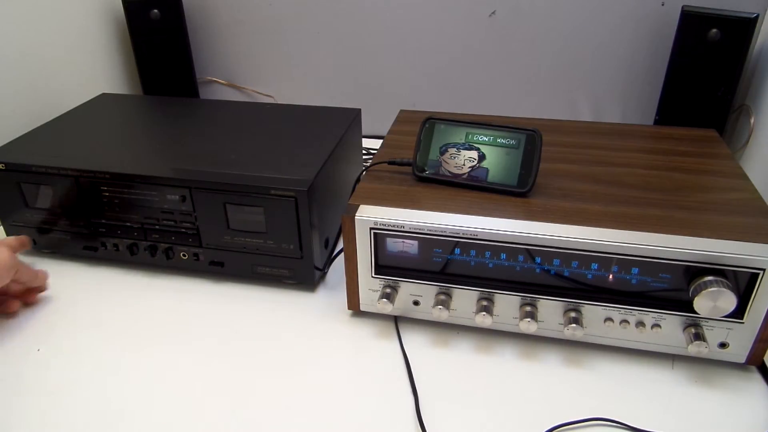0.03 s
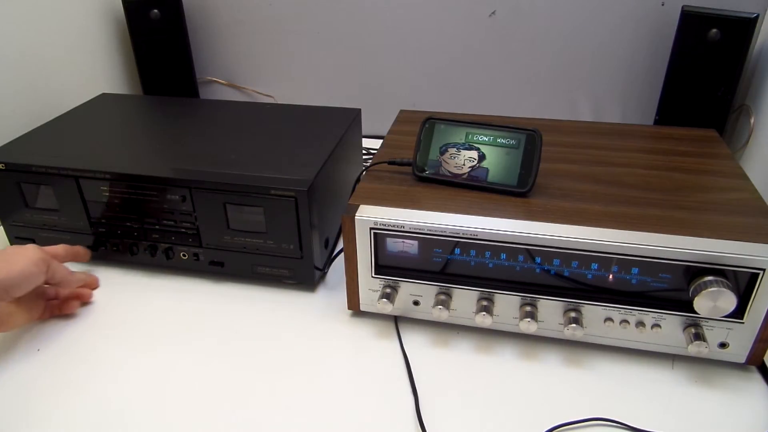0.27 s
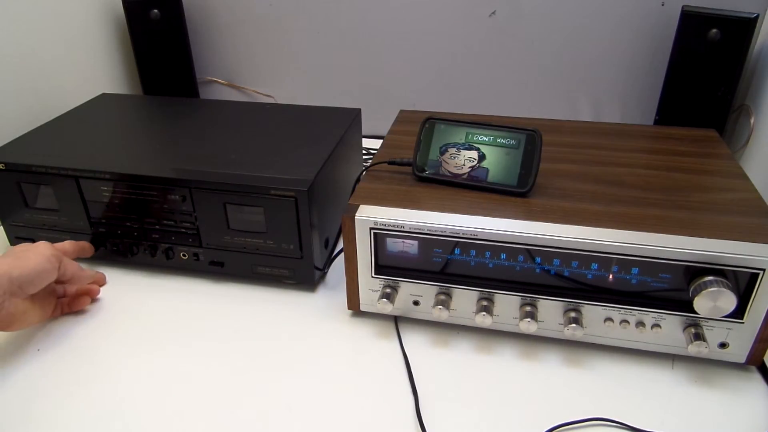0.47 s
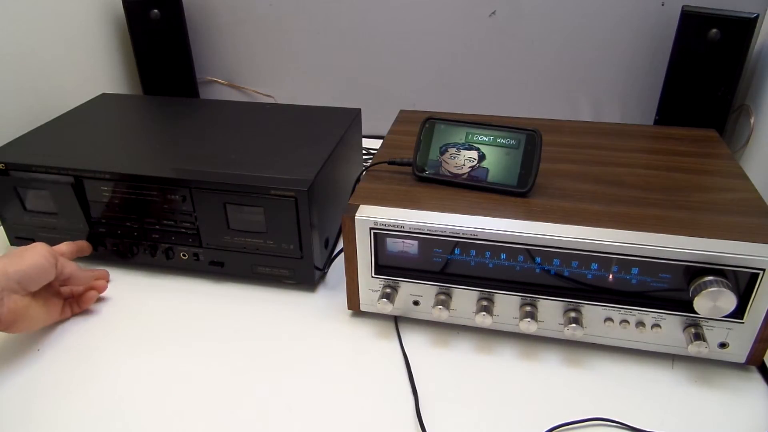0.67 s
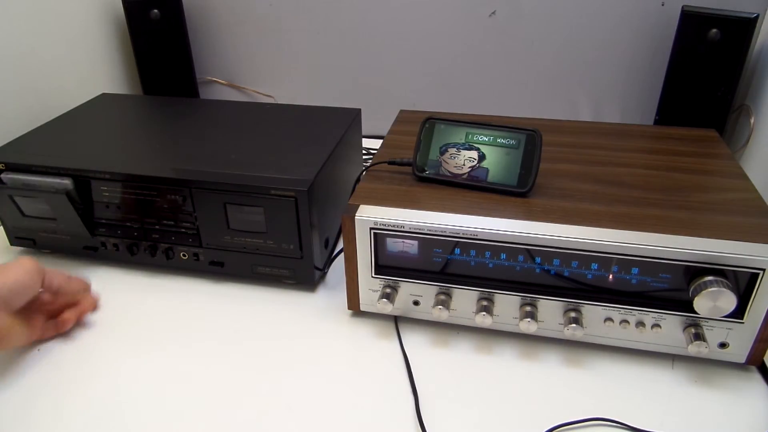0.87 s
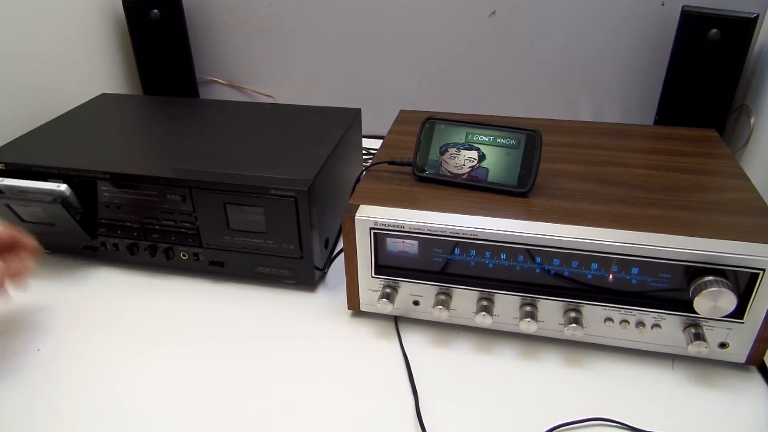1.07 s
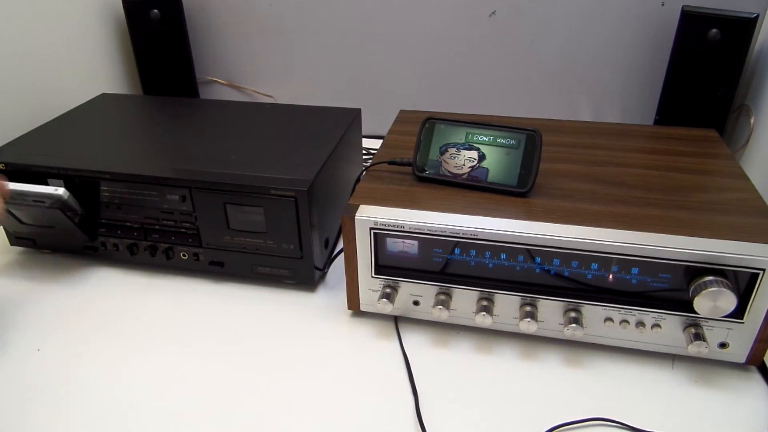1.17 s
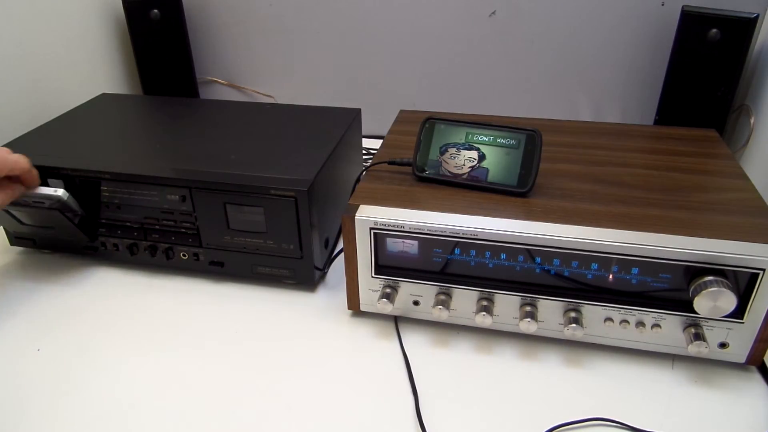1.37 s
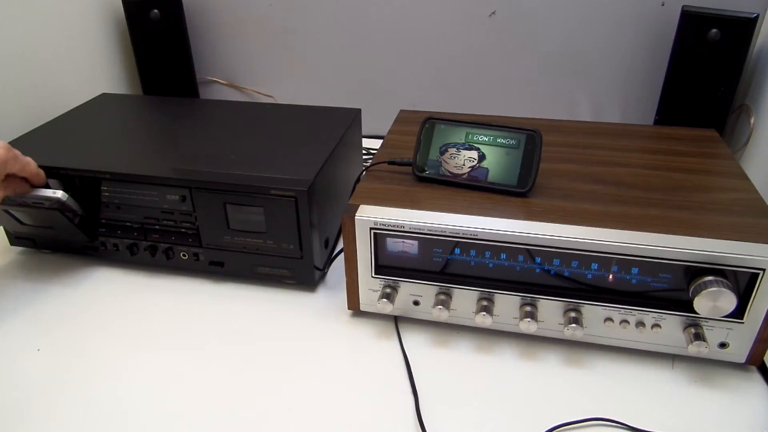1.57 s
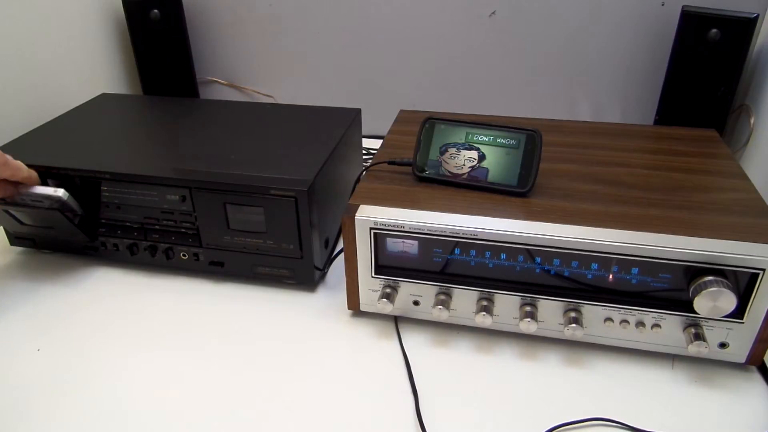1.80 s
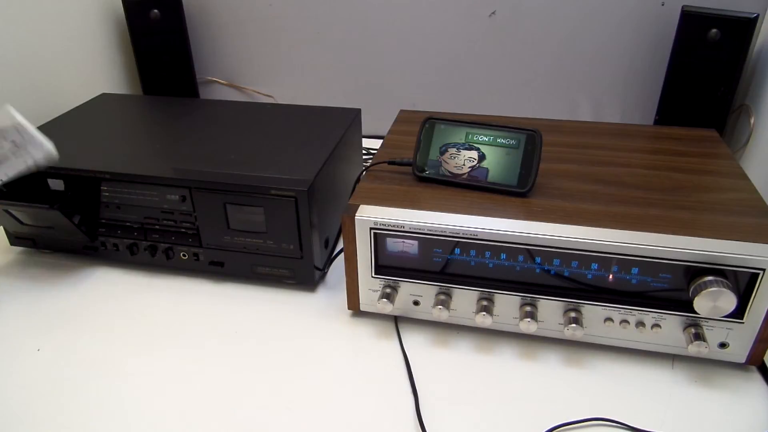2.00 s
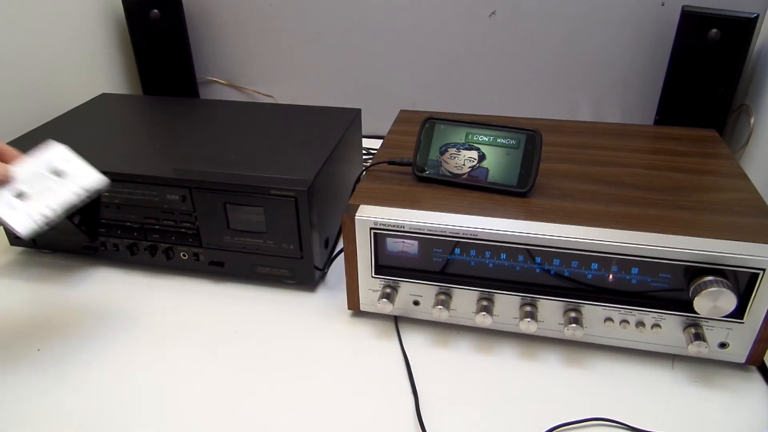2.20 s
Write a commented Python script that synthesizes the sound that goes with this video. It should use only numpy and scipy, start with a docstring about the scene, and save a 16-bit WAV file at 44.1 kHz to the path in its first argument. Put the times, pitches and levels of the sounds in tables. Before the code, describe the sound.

A cassette is ejected and pulled from a tape deck. Quiet room air and low hum come first, then faint key and latch clicks at 0.4 to 0.75 seconds, a brief glide, and a sharp door clack at 0.85. After a pause, plastic knocks begin around 1.45, building to a bright scraping rattle near 2.0, then thin squeaks until 2.25. Close microphone, short room echo.

```python
"""In a small room, a tape deck's eject key unlatches the door, which glides open and hits its stop.
Fingers knock the cassette about in its holder, then drag it out with a scrape, a rattle and a thin squeak.
Knocks are short noise bursts plus the dying tones of the case, the latch and the cassette shell.
Sliding is a stream of tiny random clicks, and squeaks are pairs of wavering tones.
Desk and walls throw it all back as fading echoes, over soft airy noise and a low hum."""
import sys
import numpy as np
from scipy import signal
from scipy.fft import rfft, irfft
from scipy.io import wavfile
from scipy.ndimage import uniform_filter1d

SR = 44100
rng = np.random.default_rng(int(sys.argv[2]) if len(sys.argv) > 2 else 0)


def store_pcm(level_fs):
    """Save levels as 16-bit WAV."""
    pcm = np.round(np.clip(level_fs, -1, 1) * 32767).astype(np.int16)
    wavfile.write(sys.argv[1], SR, np.atleast_2d(pcm).T)


N = 99048  # length in samples


def amp(db):
    """Turns decibels into a gain."""
    return 10 ** (np.asarray(db) / 20)


def unit(x):
    """Scales a sound to rms 1."""
    return x / np.sqrt(np.mean(x ** 2) + 1e-20)


def read(points, hz):
    """Reads a table between its points, along a log-frequency axis."""
    point_hz, value = np.transpose(points)
    return np.interp(np.log(hz + 1), np.log(point_hz + 1), value)


def add(mix, s, sound):
    """Mixes a sound in at time s, in seconds."""
    part = mix[round(s * SR):][:len(sound)]
    part += sound[:len(part)]


def colour(x, points):
    """Filters x by a table of frequency and dB, then scales it to rms 1."""
    gain = amp(read(points, np.fft.rfftfreq(len(x), 1 / SR)))
    return unit(irfft(rfft(x) * gain, len(x)))


def drift(size, hz):
    """Slow random motion up to about the given rate; rms 1 over the whole scene, then cut to size."""
    lowpass = np.exp(-(np.fft.rfftfreq(N, 1 / SR) / hz) ** 2)
    slow = irfft(rfft(rng.standard_normal(N)) * lowpass, N)
    return unit(slow)[:size]


# Steady tones of the hum. Each row: frequency in Hz, rms level in dB before the slow level changes.
HUM_TONES = [(48.4, -69), (301.5, -70), (328.4, -69), (355.3, -66.5), (479, -71.5), (667.5, -69.5),
             (872.1, -68), (1174, -100.5), (1369, -72), (1744, -73.5)]
# How the hum swells and sinks. Each row: time in seconds, change in dB.
HUM_LEVEL = [(0, -2), (.45, 0), (1.05, 4), (1.35, 0.5), (2.25, 3)]
# Tone colour of the room air. Each row: frequency in Hz, relative strength in dB.
AIR_COLOUR = [(12, -56), (20, 0.5), (49, 1), (70, -10), (168, 0), (234, -0.5), (357, -8), (388, 1),
              (472, -5), (527, -2), (849, -3), (1660, -11.5), (1810, -10.5), (1960, -15), (16000, -22.5)]
# How the air swells and sinks. Each row: time in seconds, change in dB.
AIR_LEVEL = [(0, 0), (.4, 0), (.95, 2.5), (1.4, 0.2), (2.25, 2.2)]
AIR_DB = -57  # before the slow level changes
HUM_WAVER_HZ = 3.11  # rms wander of each tone's frequency


def background():
    """Room air is filtered noise; the hum is a set of sines whose pitches wander separately."""
    t = np.arange(N) / SR
    hum = np.zeros(N)
    for hz, db in HUM_TONES:
        wander = np.cumsum(HUM_WAVER_HZ * drift(N, 13.6)) / SR
        cycles = hz * t + wander + rng.random()
        hum += amp(db) * unit(np.sin(2 * np.pi * cycles))
    hum *= amp(np.interp(t, *np.transpose(HUM_LEVEL)))
    air_gain = amp(AIR_DB + np.interp(t, *np.transpose(AIR_LEVEL)))
    return hum + air_gain * colour(rng.standard_normal(N), AIR_COLOUR)


def ring(modes, tilt_db=0):
    """A struck body's modes swell over a few cycles and die; tilt, in dB per octave, favours high ones."""
    t = np.arange(SR // 2) / SR
    centre = np.median([mode[0] for mode in modes])
    tones = np.zeros(len(t))
    for hz, db, t60 in modes:
        fade = amp(db + tilt_db * np.log2(hz / centre) - 60 * t / t60)
        swell = 1 - np.exp(-t * hz / 2)
        tones += fade * swell * np.sin(2 * np.pi * (hz * t + rng.random()))
    # scale by the modes' summed power before tilt
    return tones / np.sqrt(np.sum(amp([mode[1] for mode in modes]) ** 2) / 2)


# The four lists below shape a blow's five bands: thud, knock, clack, click and tick, bass first.
# Borders between the bands, in Hz; the first value is the bottom of the thud.
BAND_EDGES_HZ = [100, 350, 1100, 2400, 5200]
# Time each band takes to rise, in seconds.
RISE_S = [0.013, 0.0069, .001, 0.00025, 0.00022]
# Time each band takes to fade by 60 dB, in seconds.
BLOW_T60_S = [0.18, 0.042, 0.094, 0.05, 0.041]
SCATTER_DB = 2  # rms unevenness of the rattle


def blow(bands_db, rattle_s):
    """A hard plastic contact: uneven noise that rises, holds for the rattle and dies band by band."""
    t = np.arange(SR // 2) / SR
    chatter = rng.standard_normal(len(t)) * amp(SCATTER_DB * drift(len(t), 470))
    spectrum, hz = rfft(chatter), np.fft.rfftfreq(len(t), 1 / SR)
    # highpass at each border; neighbours subtracted leave one band
    above = [1 / (1 + (edge / (hz + 1)) ** 8) for edge in BAND_EDGES_HZ] + [0]
    out = np.zeros(len(t))
    for k, (db, rise, t60) in enumerate(zip(bands_db, RISE_S, BLOW_T60_S)):
        fade = amp(-60 * np.maximum(t - rise - rattle_s, 0) / t60)
        shape = np.minimum(t / rise, 1) * fade
        band = shape * irfft(spectrum * (above[k] - above[k + 1]), len(t))
        out += amp(db) * band * np.linalg.norm(shape) / np.linalg.norm(band)
    return out


SLIPS_PER_S = 6000  # on average
SLIP_SPREAD_DB = 0.5  # scales the random spread of slip sizes
RUB_T60_SHARE = 0.6  # sliding contact damps the modes


def rub(level, tint, bodies):
    """Stick-slip friction: dense tiny slips that also ring the bodies they touch."""
    size = amp(SLIP_SPREAD_DB * np.minimum(rng.exponential(1, N), 3.5))
    happens = rng.choice([-1., 1.], N) * (rng.random(N) < SLIPS_PER_S / SR)
    slips = size * happens
    t = np.arange(N) / SR
    force = amp(np.interp(t, *np.transpose(level), left=-120, right=-120))
    out = force * colour(slips, tint)
    for modes, db in bodies:
        damped = [(hz, mode_db, t60 * RUB_T60_SHARE) for hz, mode_db, t60 in modes]
        body = ring(damped)
        body /= np.linalg.norm(body)
        out = out + amp(db) * signal.fftconvolve(force * unit(slips), body)[:N]
    return out


# Blows of key, latch and door. Each row: start in seconds, then thud, knock, clack, click, tick,
# case ring and latch ring, all in dB, then rattle length in seconds.
DOOR_BLOWS = [ (0.422, -78, -54.5, -58, -60, -67, -66, -69, 0.016),
              (0.432, -53.5, -72, -55, -59.5, -56.5, -55, -68, 0.015),
              (.589, -59, -51.5, -50.5, -48, -59, -54, -38.5, 0.015),
              (0.606, -52.5, -69, -54, -69, -51, -48, -48, 0.0097),
              (0.64, -57, -53, -50, -75, -55, -53, -70, 0.0091),
              (0.693, -67, -59, -67, -73, -48, -60, -72, 0.0031),
              (0.73, -58, -47, -63, -51.5, -59, -73, -44, 0.021),
              (.745, -65, -57, -61, -62, -43, -62, -51.5, .002),
              (0.8539, -55, -40, -36, -40.5, -36.5, -43, -44, 0.0077),
              (0.862, -51, -51, -47, -44, -61, -35.5, -46, 0.0086),
              (0.881, -62, -42.5, -45, -50.5, -46.5, -50, -70, 0.016),
              (.900, -56, -45.5, -49, -59, -50, -59, -62, 0.0083)]
# Door gliding on its damper. Each row: time in seconds, level in dB.
GLIDE = [(.6, -65), (.625, -53), (.66, -53), (.69, -59.5), (.712, -42), (.75, -57), (.775, -57), (.84, -70),
         (.852, -38.5), (.87, -75)]
# Tone colour of the glide. Each row: frequency in Hz, relative strength in dB.
GLIDE_COLOUR = [(80, -29), (250, 5), (500, -0.5), (1400, 8.5), (2200, 0.5), (3300, -4), (4000, -2),
                (5200, -9), (9000, -9.5), (16000, -14)]
# Ringing tones of the deck's case, the latch and the cassette shell; case and shell serve cassette() too.
# Each row: frequency in Hz, relative level in dB, seconds to fade by 60 dB when struck.
CASE = [(130, -11, 0.37), (199.1, 1, 0.28), (257.8, 5, 0.33), (330.6, -4, 0.15), (496, 1.5, 0.16),
        (520.5, 1, 0.39), (760, 7.5, 0.3), (881, 4.5, 0.19), (953.5, -4, 0.18), (1277, -9, 0.45)]
LATCH = [(2080, -2, 0.17), (2830, -1, 0.21), (2670, 11, 0.055), (3050, -9, 0.096), (3100, -4, 0.11),
         (3760, -1, 0.13), (3600, -1, 0.17), (4190, -1, 0.21), (4170, -21, 0.075)]
SHELL = [(1340, -6, 0.25), (1473, -11, 0.32), (1819, -4.5, 0.34), (1887, -2, 0.28), (1986, -4, 0.24),
         (2031, 7.5, 0.14), (2067, 0.5, .16), (2853, 3.5, 0.077), (2907, 3.5, 0.094), (3325, -7, 0.17),
         (3600, -21, 0.099), (4790, -20, 0.23), (5450, -2, 0.11), (6270, -11.5, 0.1)]
SHELL_IN_DOOR_DB = -4  # the cassette rings inside the door, relative to each clack


def door():
    """The key trips the latch; the door glides open and bounces on its stop. Gives contact noise and ringing."""
    contact = rub(GLIDE, GLIDE_COLOUR, [])
    rings = np.zeros(N)
    for s, *bands_db, case_db, latch_db, rattle_s in DOOR_BLOWS:
        add(contact, s, blow(bands_db, rattle_s))
        case_ring = amp(case_db) * ring(CASE)
        latch_ring = amp(latch_db) * ring(LATCH)
        shell_ring = amp(bands_db[2] + SHELL_IN_DOOR_DB) * ring(SHELL)
        add(rings, s, case_ring + latch_ring + shell_ring)
    return np.array([contact, rings])


# Fading of the room. Each row: frequency in Hz, seconds to fade by 60 dB.
ROOM_FADE = [(150, 0.94), (400, 0.76), (1040, 0.24), (2760, 0.35), (7280, 0.2), (15000, 0.1)]
ROOM_EVEN_HZ = 70  # sets how finely the room's colour is evened out


def room(x):
    """A small, evenly coloured room: sparse reflections, each pitch region dying at its own speed."""
    size = SR // 2
    # silent for the first 6.4 ms, full strength from twice that
    onset = np.clip(np.arange(size) / SR / 0.0064 - 1, 0, 1)
    taps = rng.standard_normal(size) * (rng.random(size) < 5000 / SR) * onset
    hz, t, z = signal.stft(taps, SR, nperseg=256)
    fade = amp(-60 * t / read(ROOM_FADE, hz)[:, None])
    tail = signal.istft(z * fade, SR, nperseg=256)[1]
    spectrum = rfft(tail, SR)
    even = spectrum / np.sqrt(uniform_filter1d(abs(spectrum) ** 2, size=2 * ROOM_EVEN_HZ))
    return signal.fftconvolve(x, irfft(even, SR)[:size])[:N]


# Cassette against its holder. Each row: start in seconds, then thud, knock, clack, click, tick,
# case ring and shell ring, all in dB, then shell tilt in dB per octave and rattle length in seconds.
CASSETTE_BLOWS = [ (1.419, -53.5, -56.5, -64, -70, -60, -70, -68, 15, 0.045),
                  (1.451, -44, -44.5, -48, -44, -37, -39, -42.5, -6, 0.0085),
                  (1.534, -51.5, -46.5, -45.5, -45.5, -50.5, -48.5, -38.5, -8, 0.0081),
                  (1.7205, -46.5, -38.5, -44, -39.5, -32, -43.5, -31.5, 4.5, 0.013),
                  (1.73, -54.5, -37, -45.5, -44.5, -37.5, -62, -53, 14, 0.0075),
                  (1.8259, -49.5, -47, -46, -48.5, -52, -45, -35.5, -1, 0.0045),
                  (1.866, -48, -47, -52, -68, -62, -70, -54, -8, 0.0035),
                  (1.903, -43.5, -43.5, -50, -54, -49, -52, -41, -5, 0.011),
                  (1.924, -41.5, -36, -57, -44, -39, -36, -31.5, -2, 0.002),
                  (1.995, -47, -36, -34, -35, -28.5, -36.5, -34, 8, 0.0098),
                  (2.001, -48.5, -46, -43, -37, -25, -41, -41, 21, 0.001),
                  (2.02, -43.5, -46, -51, -30, -26, -48, -40.5, 20.5, 0.0058),
                  (2.106, -62, -72, -43, -44.5, -32, -58, -63, 7, 0.0012),
                  (2.214, -76, -62, -57, -59, -47, -75, -66, 23.5, 0.0015)]
# Cassette sliding out. Each row: time in seconds, level in dB.
SCRAPE = [(1.6, -61), (1.68, -55.5), (1.8, -62), (1.86, -50), (1.9, -42.5), (1.93, -34), (1.965, -29.5),
          (2.0, -26.5), (2.038, -33.5), (2.056, -49), (2.11, -46.5), (2.16, -51), (2.25, -65)]
# Tone colour of the scrape. Each row: frequency in Hz, relative strength in dB.
SCRAPE_COLOUR = [(60, -10), (130, -6), (250, -7), (650, 0), (900, 1.5), (1500, 2.5), (1900, -6),
                 (2170, 9.5), (2500, -6), (3350, -0.5), (4200, -7.5), (5800, -0.5), (6900, -4),
                 (8500, -6.5), (16000, -8)]
SCRAPE_CASE_DB, SCRAPE_SHELL_DB = -14, -13.5  # ringing stirred by the scrape


def cassette():
    """The shell knocks in the holder and scrapes out along its guides. Gives contact noise and ringing."""
    bodies = [(CASE, SCRAPE_CASE_DB), (SHELL, SCRAPE_SHELL_DB)]
    contact = rub(SCRAPE, SCRAPE_COLOUR, bodies)
    rings = np.zeros(N)
    for s, *bands_db, case_db, shell_db, tilt_db, rattle_s in CASSETTE_BLOWS:
        add(contact, s, blow(bands_db, rattle_s))
        case_ring = amp(case_db) * ring(CASE)
        shell_ring = amp(shell_db) * ring(SHELL, tilt_db)
        add(rings, s, case_ring + shell_ring)
    return np.array([contact, rings])


# Squeaks of the shell. Each row: start in seconds, length in seconds, level in dB before the swell and fade.
SQUEAKS = [(2.089, 0.032, -44.5), (2.132, 0.009, -56), (2.165, 0.016, -46), (2.177, .026, -72),
           (2.205, 0.031, -49.5)]
SQUEAK_HZ, SQUEAK_UPPER_HZ = 7930, 9300
SQUEAK_UPPER_DB = -10  # upper tone relative to the lower
SQUEAK_WAVER = 0.0045  # pitch waver, as a share of the frequency


def squeaks():
    """Plastic sings in short spurts on two high tones that waver together."""
    out = np.zeros(N)
    for s, length, db in SQUEAKS:
        t = np.arange(0, length, 1 / SR)
        turn = 2 * np.pi * np.cumsum(1 + SQUEAK_WAVER * drift(len(t), 250)) / SR
        tone = np.sin(SQUEAK_HZ * turn) + amp(SQUEAK_UPPER_DB) * np.sin(SQUEAK_UPPER_HZ * turn)
        swell = np.sqrt(abs(np.sin(np.pi * t / length)))
        add(out, s, amp(db) * swell * unit(tone))
    return out


ROOM_DB, RING_ROOM_DB = -6.5, -20  # how much contact noise and ringing enter the room


def scene():
    """Deck and cassette, their echoes in the room, and the background."""
    contact, rings = door() + cassette()
    contact = contact + squeaks()
    echoes = room(amp(ROOM_DB) * contact + amp(RING_ROOM_DB) * rings)
    return (contact + rings + echoes + background())[None]


MIC_TOP_HZ, EDGE_HZ = 16200, 15900  # gentle treble roll-off, steep upper limit


def record(dry):
    """The microphone's soft top end, then a steep band limit."""
    soft = signal.lfilter(*signal.butter(2, MIC_TOP_HZ, fs=SR), dry)
    limit = signal.firwin(511, EDGE_HZ, window=("kaiser", 9), fs=SR)
    return signal.oaconvolve(soft, limit[None], "same")


dry = scene()
out = record(dry)
store_pcm(out)
```